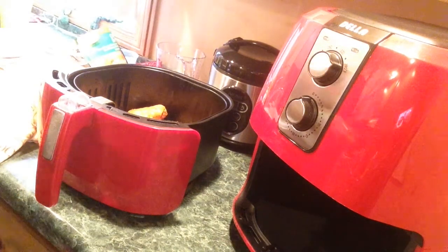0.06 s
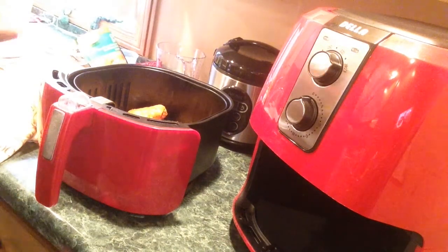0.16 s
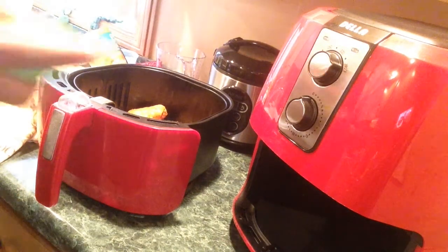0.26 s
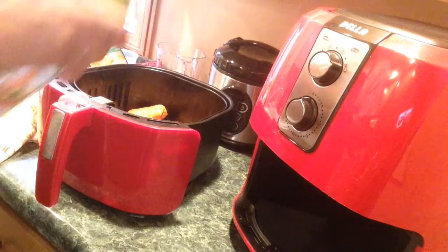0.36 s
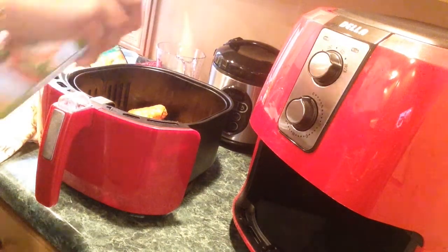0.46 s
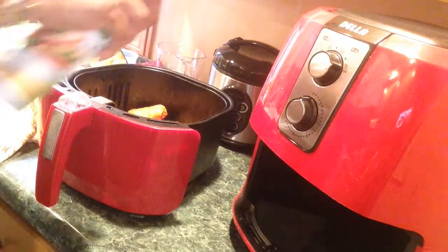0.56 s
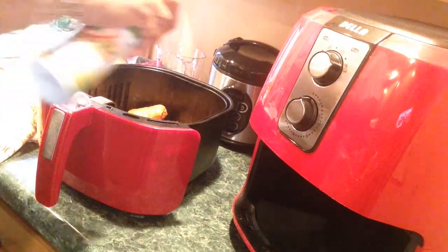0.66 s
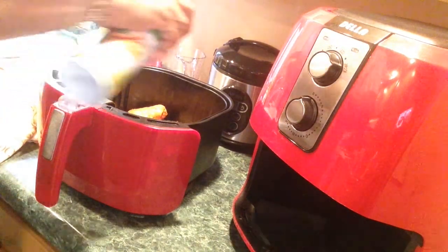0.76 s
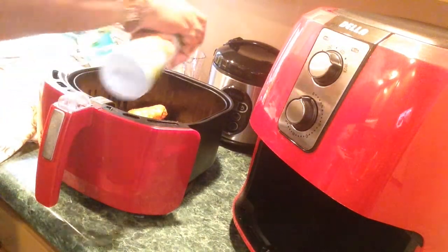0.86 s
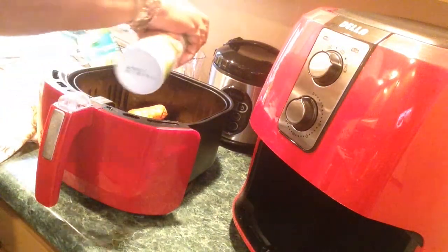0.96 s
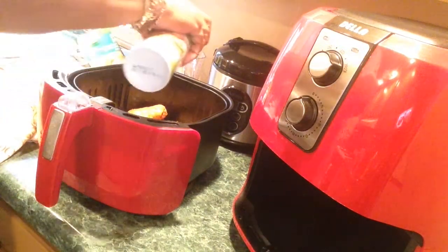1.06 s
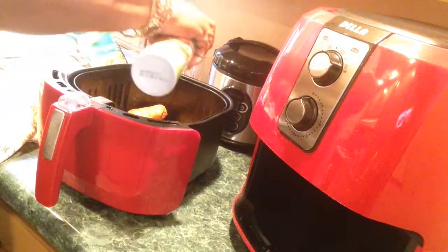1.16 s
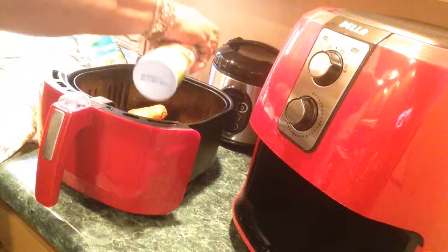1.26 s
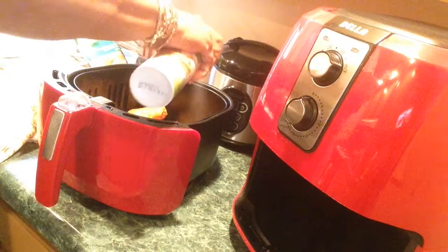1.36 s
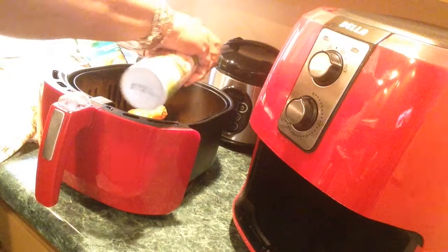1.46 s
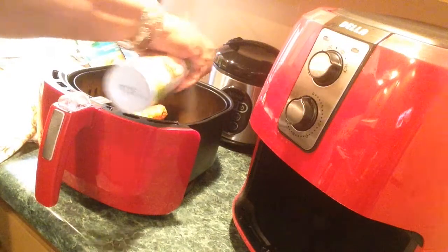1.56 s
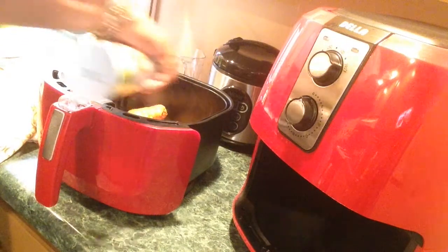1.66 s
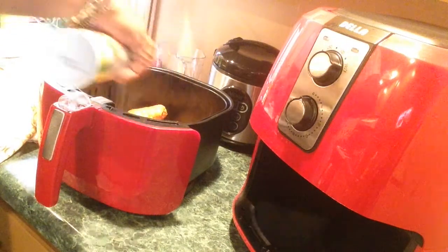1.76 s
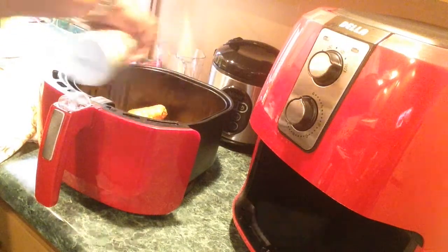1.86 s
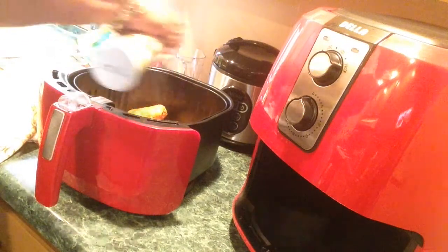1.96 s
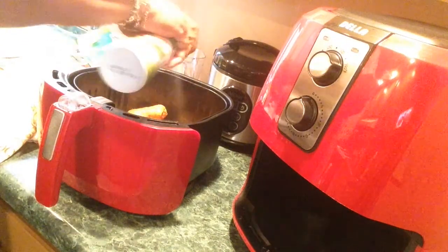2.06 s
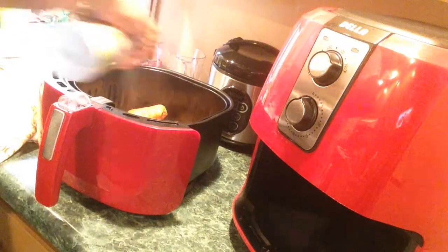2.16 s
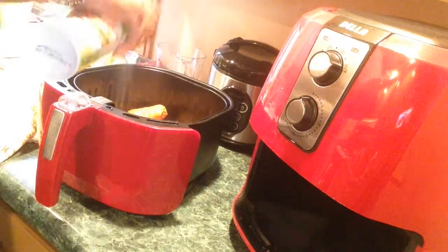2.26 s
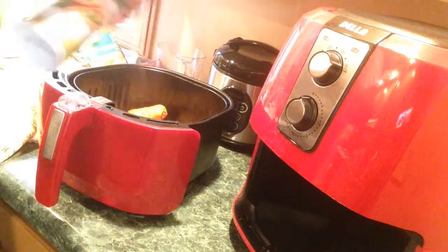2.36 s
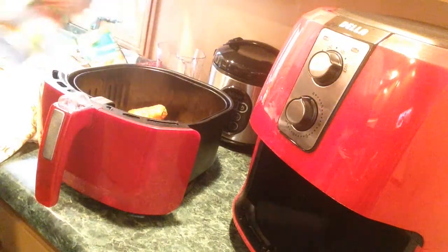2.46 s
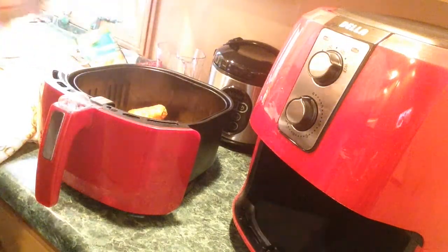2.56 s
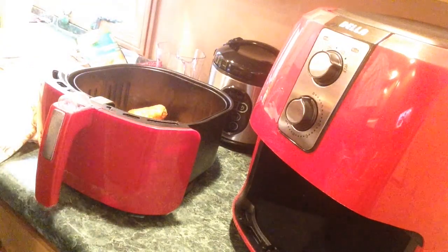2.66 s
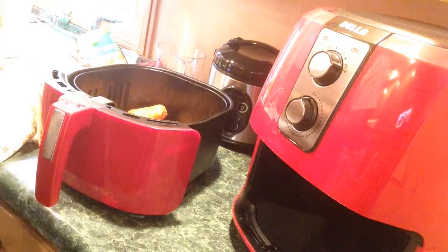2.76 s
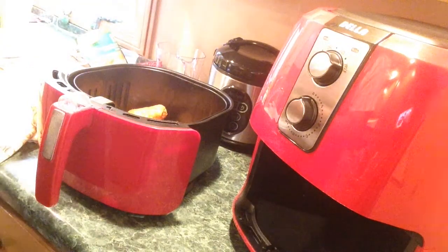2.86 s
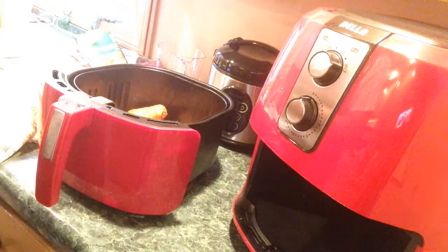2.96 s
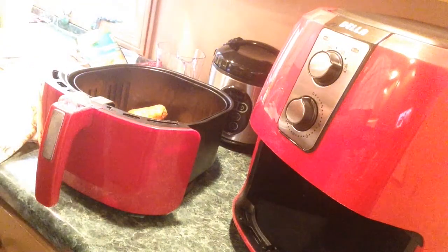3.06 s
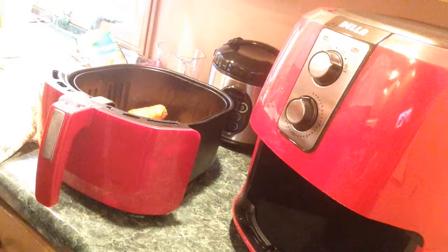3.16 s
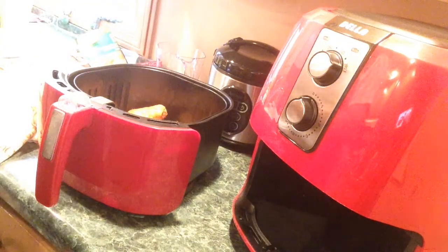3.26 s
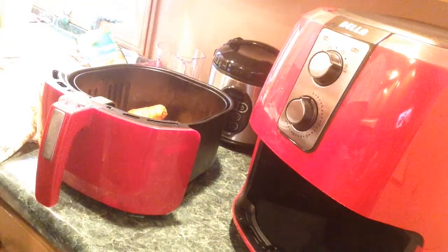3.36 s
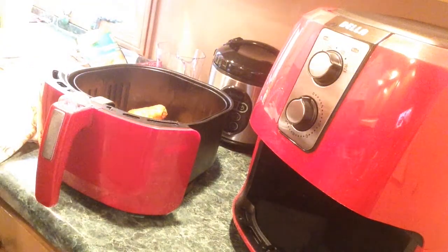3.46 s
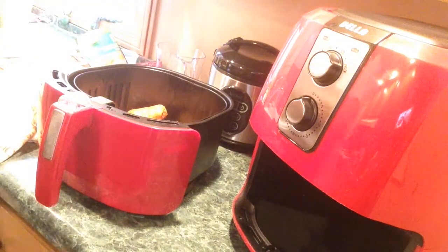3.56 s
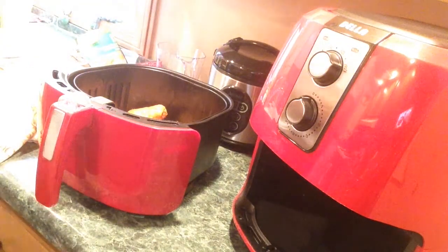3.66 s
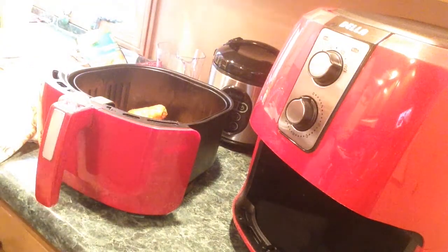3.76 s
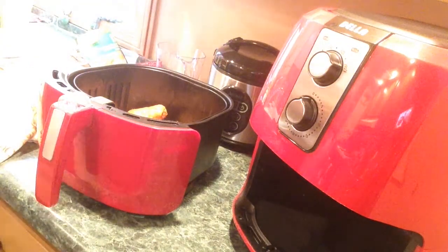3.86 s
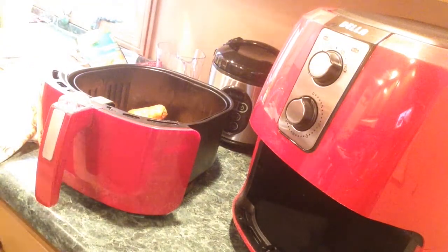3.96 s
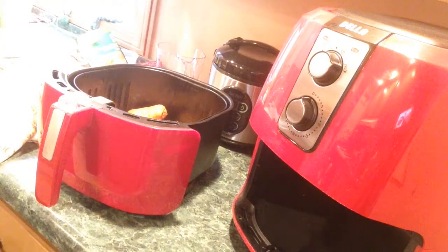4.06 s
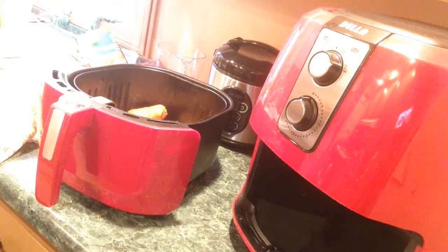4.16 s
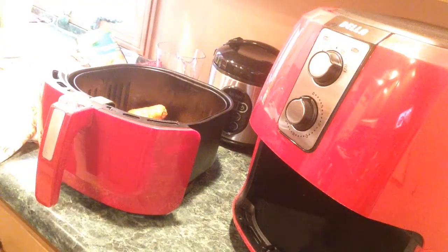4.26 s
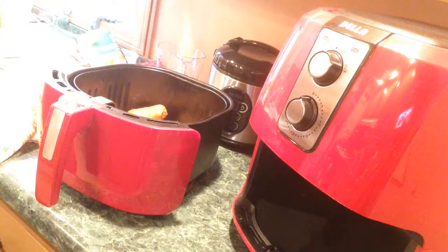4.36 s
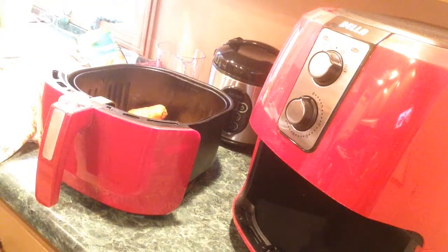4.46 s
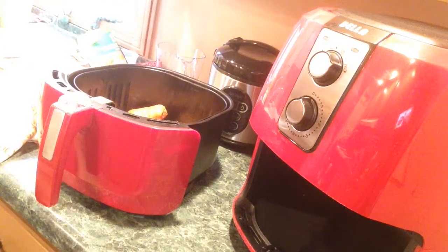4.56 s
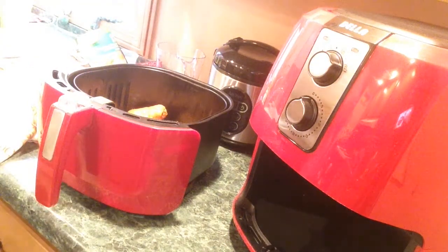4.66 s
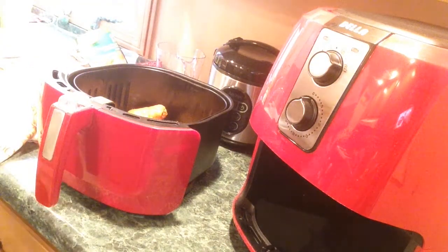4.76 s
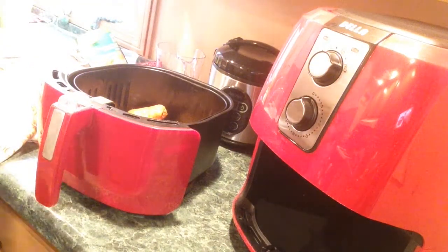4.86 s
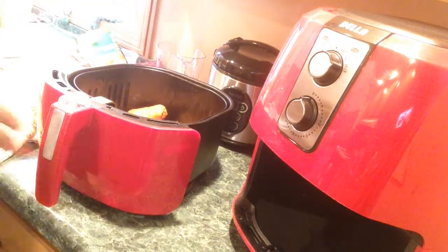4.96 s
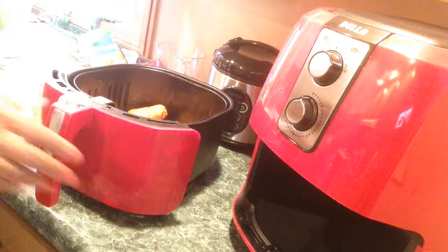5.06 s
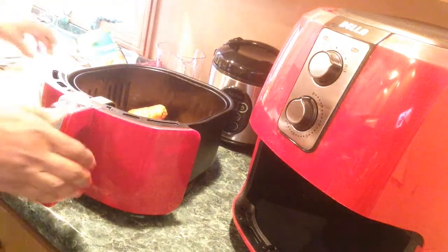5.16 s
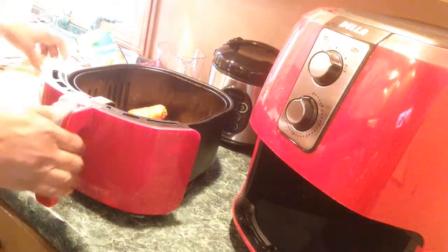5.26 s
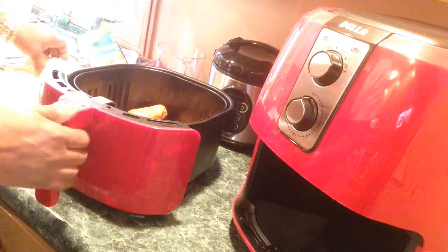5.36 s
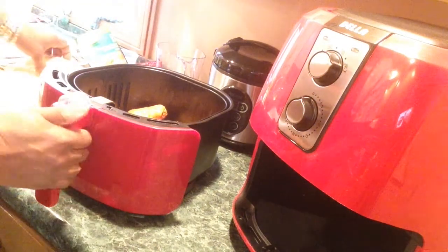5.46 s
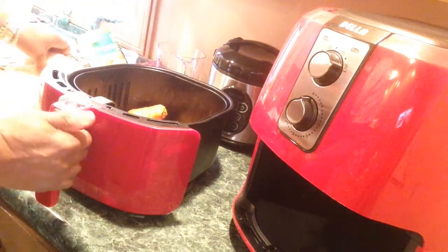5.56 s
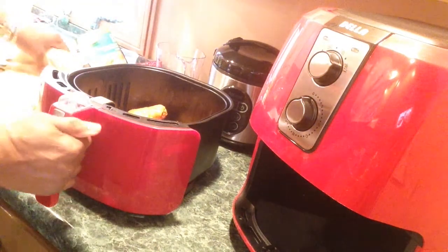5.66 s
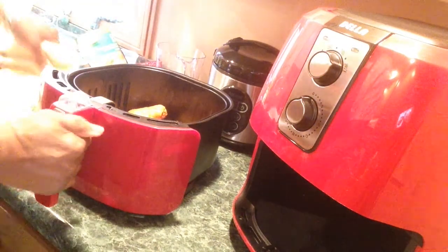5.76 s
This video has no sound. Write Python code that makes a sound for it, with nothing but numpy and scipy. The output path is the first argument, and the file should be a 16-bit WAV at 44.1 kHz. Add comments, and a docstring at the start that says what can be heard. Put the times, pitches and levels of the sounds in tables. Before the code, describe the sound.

In a small kitchen, a spray can rustles, hisses for a second and knocks down; a door bangs overloaded, then a plastic drawer clicks.

```python
"""Cooking spray and air fryer basket

At a kitchen counter something rustles as a can of cooking oil is picked up; it sprays for a second into
an air fryer basket. The can lands with a hollow knock, small things crinkle, and a cupboard door bangs into
clipping; then a hand takes the plastic handle and the basket clatters in its drawer.
Hits are decaying modes over a dense clatter; spray, rustle and slides are coloured noise or random slips."""
import sys
import numpy as np
from scipy import signal
from scipy.io import wavfile
from scipy.ndimage import map_coordinates

SR = 44100
rng = np.random.default_rng(int(sys.argv[2]) if len(sys.argv) > 2 else 0)


def store_wav(level_fs):
    """Save 16-bit WAV to argv[1]."""
    pcm = np.round(np.clip(np.atleast_2d(level_fs), -1, 1) * 32767)
    wavfile.write(sys.argv[1], SR, pcm.T.astype(np.int16))


N = 256220
TIME = np.arange(N) / SR  # the whole scene, s
RING = TIME[:24576]  # the time within one hit, s


def gain_of(db):
    """Decibels to amplitude."""
    return 10 ** (np.asarray(db) / 20)


def evened(x):
    """Scales to rms 1."""
    return x / np.sqrt(np.mean(x ** 2) + 1e-20)


def evened_attack(x):
    """Scales a dying sound to rms 1 over its first 20 ms."""
    return x / np.sqrt(np.mean(x[:SR // 50] ** 2) + 1e-20)


def read(points, hz):
    """Reads a table on a log-frequency axis."""
    f, value = np.transpose(points)
    return np.interp(np.log(hz + 1), np.log(f + 1), value)


def bumps(peaks, hz):
    """The dB shape of a few broad resonances."""
    return sum(db / (1 + (2 * (hz - f) / width) ** 2) for f, width, db in peaks)


def above(edge_hz, hz):
    """The dB slope of a steep low cut."""
    return -10 * np.log10(1 + (edge_hz / (hz + 1)) ** 6)


def below(edge_hz, hz):
    """The dB slope of a steep high cut."""
    return -10 * np.log10(1 + (hz / edge_hz) ** 6)


def add(mix, s, sound):
    """Mixes a sound in at time s."""
    part = mix[round(s * SR):][:len(sound)]
    part += sound[:len(part)]


def coloured(x, shape_db):
    """Causal minimum-phase filter with a given dB shape over frequency, its peak set to 0 dB."""
    db = shape_db(abs(np.fft.fftfreq(4096, 1 / SR)))
    log_gain = np.log(gain_of(np.maximum(db - db.max(), -90)))
    taps = np.fft.ifft(np.exp(np.conj(signal.hilbert(log_gain)))).real
    return signal.oaconvolve(x, taps[:len(taps) // 2])[:len(x)]


def reshaped(x, shape_db, size=1024):
    """Short-time filter whose dB gain is a function of time and frequency."""
    overlap = size * 3 // 4
    hz, t, z = signal.stft(x, SR, nperseg=size, noverlap=overlap)
    return signal.istft(z * gain_of(shape_db(t, hz)), SR, nperseg=size, noverlap=overlap)[1][:len(x)]


def dying(x, t60):
    """Lets each band of x die at its own speed, t60 being a table of f/Hz, t60/s."""
    return reshaped(x, lambda t, hz: -60 * t / read(t60, hz)[:, None], size=256)


def flutter(per_s):
    """A random wobble of rms 1, drawn per_s times a second and joined by straight lines."""
    draws = rng.standard_normal(N // 20)
    return evened(np.interp(TIME * per_s, np.arange(len(draws)), draws))


def patches(t, hz, per_s, width_hz):
    """Random peaks and dips of rms 1 that come and go over time and frequency."""
    field = rng.standard_normal((400, 200))
    grid = np.meshgrid(hz / width_hz, t * per_s, indexing="ij")
    return evened(map_coordinates(field, grid, order=1, mode="wrap"))


def envelope(start, length, attack, t60):
    """Attack, hold and release, as a gain over the whole scene."""
    release_db = -60 * np.maximum(TIME - start - length, 0) / t60
    return np.clip((TIME - start) / attack, 0, 1) * gain_of(release_db)


def slips(per_s, spread_db):
    """Random little impulses of uneven size."""
    size_db = spread_db * np.minimum(rng.exponential(1, N), 4)
    return rng.standard_normal(N) * gain_of(size_db) * (rng.random(N) < per_s / SR)


def halves(x, shape_db, split_hz):
    """Colours a steady excitation and splits it into an upper and a lower part, each of rms 1."""
    upper = coloured(x, lambda hz: shape_db(hz) + above(split_hz, hz))
    # the lower part runs the excitation backwards, so the two move differently
    lower = coloured(x[::-1], lambda hz: shape_db(hz) + below(split_hz, hz))
    return evened(upper), evened(lower)


def fizz(centre_hz, octaves, rise, t60):
    """A short noisy ring around one pitch."""
    burst = rng.standard_normal(len(RING)) * (1 - np.exp(-RING / rise)) * gain_of(-60 * RING / t60)

    def band_db(hz):
        distance = np.log2((hz + 1) / centre_hz) / octaves
        return -20 * np.log10(1 + distance ** 2) + above(1200, hz)
    return evened_attack(coloured(burst, band_db))


def blow(modes, colour, tilt, length, clatter_db, clatter_t60, rise, thin_hz=20, dull_hz=15000):
    """One hit: clear modes over dense clatter; a light contact leaves out the bass, a soft one the treble."""
    def contact_db(hz):
        slope = tilt * np.log2(np.clip(hz, 150, 8000) / 1000)
        return slope - 10 * np.log10(1 + (hz / dull_hz) ** 4 + (thin_hz / (hz + 1)) ** 4)

    clear = np.zeros(len(RING))
    for k, (f, db, t60) in enumerate(modes):
        fade_db = db + contact_db(f) - 60 * RING / (t60 * length)
        clear += (-1) ** k * gain_of(fade_db) * np.sin(2 * np.pi * f * RING)  # alternating polarity
    dense = dying(rng.standard_normal(len(RING)), [(f, t60 * length) for f, t60 in clatter_t60])
    dense = coloured(dense, lambda hz: read(colour, hz) + contact_db(hz))
    both = evened_attack(clear) + gain_of(clatter_db) * evened_attack(dense)
    return evened_attack(both * (1 - np.exp(-RING / rise)))


def floor(level_db=-64):
    """Quiet room tone and microphone hiss: steady coloured noise."""
    # spectrum of the background: f/Hz, relative level per Hz/dB
    floor_colour = [(24, -72.5), (40, -45.5), (84, -24), (108, -8.5), (240, -3), (259, -7.5), (293, -3.5),
                    (447, -9.5), (773, -11), (2750, -16), (3110, -15.5), (3700, -16), (9540, -17.5),
                    (15300, -17.5)]
    noise = coloured(rng.standard_normal(N), lambda hz: read(floor_colour, hz))
    return gain_of(level_db) * evened(noise)


def kitchen(x, wet_db=-11, first_echo=0.0072):
    """A small hard room: sparse reflections, each band dying at its own speed."""
    # decay of the room: f/Hz, t60/s
    room_t60 = [(150, 0.33), (600, 0.34), (2000, 0.34), (5000, 0.25), (14000, 0.47)]
    signs = rng.choice([-1., 1.], len(RING))
    taps = signs * (rng.random(len(RING)) < 3000 / SR) * (RING > first_echo)  # 3000 echoes a second
    tail = dying(taps, room_t60)
    return x + gain_of(wet_db) * signal.fftconvolve(x, tail / np.linalg.norm(tail))[:N]


def crinkles(grains_per_s=500, grain_db=-1.5, grain_t60=.05, rise=0.0018, tick_t60=0.12):
    """Distinct ticks of band-shaped noise, and a treble crackle of random slips that each ring briefly."""
    # small ticks: t/s, level/dB, centre f/Hz, width/octaves
    ticks = [(.479, -51, 13500, .25), (.813, -66.5, 3400, .25), (2.434, -50.5, 9300, 0.12),
             (2.439, -55.5, 2150, .08), (2.533, -55, 5300, .08), (2.585, -60, 3400, .15),
             (3.076, -56.5, 9000, .74), (3.188, -47.5, 3550, .2), (3.4125, -56.5, 3045, .03),
             (3.554, -54.5, 12500, 0.22), (3.664, -54, 14200, .05), (3.708, -59, 10100, 2.5)]
    # a fine crackle starts and dies: t/s, level/dB, t60/s
    crackles = [(3.32, -57, 0.98), (3.554, -57.5, 3.0)]
    # spectrum of the crackle: f/Hz, relative level per Hz/dB
    crackle_colour = [(2000, -34.5), (6000, -21), (9000, -10), (12500, -9), (14500, -0.5), (15300, -8)]
    grain = rng.standard_normal(len(RING)) * gain_of(-60 * RING / grain_t60)
    grains = signal.oaconvolve(slips(grains_per_s, grain_db), grain)[:N]
    crackle = evened(coloured(grains, lambda hz: read(crackle_colour, hz)))
    out = crackle * sum(gain_of(db) * envelope(s, 0, rise, t60) for s, db, t60 in crackles)
    for s, db, centre_hz, octaves in ticks:
        add(out, s, gain_of(db) * fizz(centre_hz, octaves, rise, tick_t60))
    return out


def rustle(grains_per_s=4000, grain_db=1.5, smooth=0.54, patchy_db=3.6, attack=.007, t60=0.21):
    """Dense little slips of a brushed surface, whose resonances shift as it moves."""
    # strokes; a larger patch sounds deeper:
    # start t/s, length/s, bright scrape level/dB, dull scrape level/dB, lowest f/Hz
    strokes = [(0, 0.05, -57.5, -56.5, 1020), (0.058, 0.015, -42, -57, 2700), (0.072, .034, -38, -40, 2470),
               (0.129, 0.12, -38.5, -42, 1370), (0.258, 0.082, -46.5, -47.5, 550),
               (.345, 0.055, -44, -43.5, 1020), (0.474, 0.028, -63, -51, 1660),
               (0.594, 0.011, -59.5, -76, 6000), (2.499, .008, -46, -48, 2130),
               (2.563, 0.02, -59.5, -59, 2600), (3.138, .07, -58, -57, 2960),
               (3.348, 0.021, -59, -74.5, 6000)]
    # spectrum of the surface: f/Hz, relative level per Hz/dB
    rustle_colour = [(180, -60), (300, -14), (639, -4), (717, -13), (792, -8.5), (1930, -6.5), (2630, -7.5),
                     (3210, -4), (4530, -5), (9650, -1.5), (15300, -9)]
    # its broad resonances: f/Hz, width/Hz, lift/dB
    rustle_peaks = [(1850, 470, 1), (2517, 400, -1), (3140, 220, 2)]
    drive = slips(grains_per_s, grain_db) + smooth * rng.standard_normal(N)
    drive = drive * gain_of(1.5 * flutter(per_s=130))
    drive = reshaped(drive, lambda t, hz: patchy_db * patches(t, hz, per_s=22, width_hz=260), size=512)
    bright, dull = halves(drive, lambda hz: read(rustle_colour, hz) + bumps(rustle_peaks, hz), split_hz=3740)
    out = np.zeros(N)
    for s, length, bright_db, dull_db, lowest_hz in strokes:
        blend = gain_of(bright_db) * bright + gain_of(dull_db) * dull
        scrape = coloured(blend, lambda hz: above(lowest_hz, hz))
        out += scrape * envelope(s, length, attack, t60)
    return out


def can():
    """The can lands on its rim, rocks and settles: hollow ringing modes, and a noisy ring of the rim."""
    # the can meets the counter: t/s, level/dB, tilt/dB per octave, ring length factor
    can_hits = [(2.8586, -16.5, 0, 0.84), (2.8664, -24, 2.5, 0.59), (2.898, -30, 1.5, 0.7),
                (2.948, -36.5, -6.5, 0.64), (2.9595, -41.5, 3.5, 0.83)]
    # modes of the can, before the ring length factor: f/Hz, level/dB, t60/s
    can_modes = [(593, -15.5, 0.23), (655, -15.5, 0.05), (807, -6, 0.18), (899, -7.5, 0.18),
                 (1090, -7, 0.18), (1330, 2.5, .18), (1458, 1, .13), (1568, -1, 0.19), (1670, -5, 0.14),
                 (1907, -3, .12), (2203, 0, .16), (2510, -10.5, .17), (2723, -6.5, 0.19),
                 (3340, -15.5, .17), (5230, -14, .1), (6900, -13.5, 0.17)]
    # spectrum of its clatter: f/Hz, relative level per Hz/dB
    can_colour = [(40, -63), (150, -47.5), (420, -27.5), (560, -11.5), (700, -13), (880, -17),
                  (1200, -11.5), (1380, -5), (1800, -10.5), (2230, -12), (2750, -10.5), (3300, -22.5),
                  (4400, -27.5), (6900, -26), (15000, -42.5)]
    # the rim sings as the can rocks: t/s, level/dB, centre f/Hz, width/octaves
    rim_rings = [(2.899, -33.5, 3290, 0.069)]
    clatter_t60 = [(400, 0.19), (2000, 0.18), (9000, 0.21)]  # f/Hz, t60/s
    out = np.zeros(N)
    for s, db, tilt, length in can_hits:
        hit = blow(can_modes, can_colour, tilt, length, clatter_db=-.5, clatter_t60=clatter_t60,
                   rise=0.00015, thin_hz=70)
        add(out, s, gain_of(db) * hit)
    for s, db, centre_hz, octaves in rim_rings:
        add(out, s, gain_of(db) * fizz(centre_hz, octaves, rise=0.0046, t60=0.097))
    return out


def door():
    """A heavy, dull bang of low modes with a rattle of the catch."""
    # the door strikes, settles and rebounds:
    # t/s, level/dB, tilt/dB per octave, ring length factor, thin below f/Hz
    door_hits = [(4.193, -23, 1.5, 0.73, 470), (4.1983, -7.5, 0.5, 0.44, 320), (4.2077, -8, -2, 0.56, 20),
                 (4.2187, -14, 1, 0.85, 435), (4.236, -20.5, 0, 0.98, 280), (4.3023, -25.5, -2.5, 1, 550),
                 (4.357, -37, 5.5, 1, 190), (4.462, -50.5, -0.5, .9, 220)]
    # modes of the door and its catch, before the ring length factor: f/Hz, level/dB, t60/s
    door_modes = [(129.5, -22, 0.2), (188.3, -7.5, 0.35), (242, -9, 0.12), (277.3, -1, 0.25),
                  (324.8, -7, .14), (361.4, 1, 0.14), (436.8, 0, .16), (464.2, 0, .25), (499.3, -5, .16),
                  (590, -8.5, 0.35), (625, -14, 0.2616), (667, -15, .22), (834, -17, 0.3), (880, -6, 0.16),
                  (1022.6, -8.5, .15), (1094, -18, 0.29), (1185, -10.5, .2), (1324, -20, .17),
                  (1587, -18.5, .17), (2011, -16, 0.12), (4943, -26.5, .16), (4963, -29.5, .15)]
    # spectrum of its clatter: f/Hz, relative level per Hz/dB
    door_colour = [(30, -21.5), (80, -27.5), (150, -18), (220, -12.5), (480, 1), (620, -3.5), (760, -9),
                   (1050, -10), (1900, -16), (2600, -23), (4200, -32.5), (4900, -26.5), (5600, -37.5),
                   (9500, -34), (15000, -39.5)]
    clatter_t60 = [(80, .17), (500, 0.24), (2000, 0.24), (5000, 0.3), (9000, 0.24)]  # f/Hz, t60/s
    out = np.zeros(N)
    for s, db, tilt, length, thin_hz in door_hits:
        hit = blow(door_modes, door_colour, tilt, length, clatter_db=-1.0, clatter_t60=clatter_t60,
                   rise=0.00095, thin_hz=thin_hz)
        add(out, s, gain_of(db) * hit)
    return out


def basket(low_hz=90, ring=0.88, slide_low_hz=620, slide_attack=0.042, slide_t60=0.13):
    """Soft bumps of the hand, hard plastic clicks and short slides; so small a shell gives no deep bass."""
    # knocks on plastic, then the handle is gripped: t/s, level/dB, thin below f/Hz, dull above f/Hz
    basket_hits = [(3.0728, -43, 480, 2500), (4.819, -51, 115, 400), (5.279, -44, 169.7, 4397),
                   (5.291, -42.5, 200, 3400), (5.32, -38, 220, 11100), (5.459, -47.5, 600, 2600),
                   (5.4708, -42.5, 620, 1190), (5.496, -39.5, 450, 9050), (5.521, -36.5, 130, 7460),
                   (5.524, -47.5, 190, 350), (5.595, -46, 1100, 1300), (5.758, -55, 526, 900)]
    # modes of the plastic drawer, before the ring factor: f/Hz, level/dB, t60/s
    basket_modes = [(190, -3, 0.086), (262, -0.5, 0.11), (632, 1, 0.067), (797, -3.5, 0.2), (997, 2, 0.094),
                    (1426, -22, 0.082), (2840, -1, 0.047)]
    # spectrum of its clatter and slides: f/Hz, relative level per Hz/dB
    basket_colour = [(59, -32), (100, -19), (172, 1.5), (324, -12.5), (594, -0.5), (885, -10), (1000, -4.5),
                     (2090, -9.5), (2860, -5.5), (5370, -15.5), (6090, -26), (8700, -18.5), (15000, -36.5)]
    # the basket slides between the knocks: start t/s, length/s, level/dB, dull above f/Hz
    slides = [(5.228, .06, -60, 1710), (5.4, 0.058, -56.5, 1700), (5.561, 0.059, -49.5, 1810),
              (5.625, 0.064, -59, 3600)]
    clatter_t60 = [(300, 0.13), (3000, 0.21), (9000, 0.23)]  # f/Hz, t60/s
    # a harder contact is brighter: dB per octave for each octave of its upper edge, untilted edge in Hz
    tilt_per_octave, neutral_hz = 1.66, 2980
    out = np.zeros(N)
    for s, db, thin_hz, dull_hz in basket_hits:
        tilt = tilt_per_octave * np.log2(dull_hz / neutral_hz)
        hit = blow(basket_modes, basket_colour, tilt, ring, clatter_db=6.5, clatter_t60=clatter_t60,
                   rise=0.00019, thin_hz=thin_hz, dull_hz=dull_hz)
        add(out, s, gain_of(db) * hit)
    friction = slips(per_s=1100, spread_db=1.0)
    for s, length, db, dull_hz in slides:
        scrape = coloured(friction, lambda hz: (read(basket_colour, hz) + above(slide_low_hz, hz)
                                                + below(dull_hz, hz)))
        out += gain_of(db) * evened(scrape) * envelope(s, length, slide_attack, slide_t60)
    return signal.sosfilt(signal.butter(2, low_hz, "highpass", fs=SR, output="sos"), out)


def spray(sputter_db=0.06, waver_db=0.8, pop_db=-30, pop_rise=0.00056):
    """The valve pops open, the jet hisses with a slight sputter, and the pressure dies as it shuts."""
    # spectrum of the jet: f/Hz, relative level per Hz/dB
    jet_colour = [(88, -61), (150, -45), (345, -23.5), (418, -31.5), (470, -27.5), (640, -30.5), (925, -19),
                  (1170, -20), (1440, -15), (1620, -18.5), (2530, -12.5), (4980, -10), (9800, 0.5),
                  (14400, -0.5), (15300, -3)]
    # air resonances of the basket under the jet: f/Hz, width/Hz, lift/dB
    basket_air = [(460, 54, 11), (610, 200, -8.5), (950, 340, 3.5), (1814, 130, 6), (2540, 270, 0)]
    # as the can moves, echoes from the basket walls add and cancel: f/Hz, depth of the drifting ripple/dB
    ripple = [(300, 1), (2000, 3), (5000, 3.5), (14000, -0.8)]
    # the jet swells as it sweeps over the food: t/s, half length/s, lift/dB
    surges = [(1.38, 0.052, 2), (1.683, 0.044, 3), (1.807, 0.022, 2), (2.367, 0.025, 3)]
    # the bright hiss at the nozzle, then the dull rush in the basket: level/dB, attack/s, release t60/s
    hiss = (-25.5, 0.022, 0.12)
    rush = (-40, 0.0021, .36)
    # modes of the valve's pop: f/Hz, level/dB, t60/s
    valve_modes = [(484, -15, 0.094), (913, -3, 0.077), (994, 4, 0.061), (1200, -10, 0.1),
                   (2450, -9, 0.054)]
    opens, shuts = 1.306, 2.346  # s
    sag_db_per_s = 0.43  # the pressure falls while the valve is held

    jet = rng.standard_normal(N) * gain_of(sputter_db * flutter(per_s=120) + waver_db * flutter(per_s=25))
    jet = reshaped(jet, lambda t, hz: read(ripple, hz)[:, None] * patches(t, hz, per_s=7.7, width_hz=120))
    parts = halves(jet, lambda hz: read(jet_colour, hz) + bumps(basket_air, hz), split_hz=4480)
    swell_db = sum(lift * np.exp(-((TIME - s) / half) ** 2) for s, half, lift in surges)
    flow_db = swell_db - sag_db_per_s * (TIME - opens)
    out = np.zeros(N)
    for part, (db, attack, t60) in zip(parts, (hiss, rush)):
        out += part * gain_of(db + flow_db) * envelope(opens, shuts - opens, attack, t60)

    # f/Hz, relative level per Hz/dB
    pop_colour = [(50, -36), (180, -11), (900, -0.5), (1800, -2.5), (5000, -16.5), (13000, 1.5)]
    pop = blow(valve_modes, pop_colour, tilt=0, length=1.0, clatter_db=-2.0,
               clatter_t60=[(500, 0.27), (9000, 0.77)], rise=pop_rise)
    add(out, 1.3105, gain_of(pop_db) * pop)
    return out


def scene():
    """All sources in the kitchen, in one channel."""
    sources = rustle() + spray() + crinkles() + can() + door() + basket()
    return (kitchen(sources) + floor())[None]


def record(dry, edge_hz=15400):
    """The bang overloads the microphone and clips at full scale; then the treble is cut off at edge_hz."""
    clipped = np.clip(dry, -1, 1)
    low_pass = signal.firwin(801, edge_hz, window=("kaiser", 9), fs=SR)
    return signal.oaconvolve(clipped, low_pass[None], "same")


dry = scene()
out = record(dry)
store_wav(out)
```